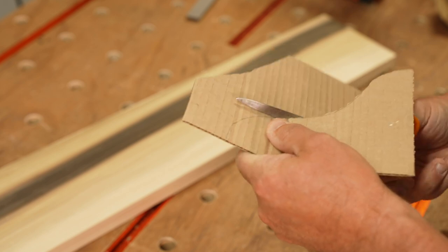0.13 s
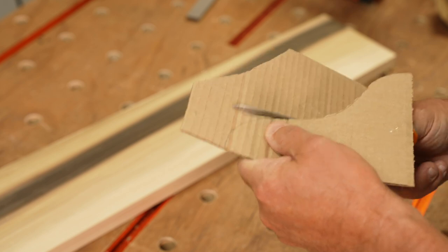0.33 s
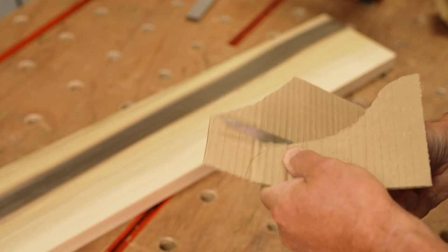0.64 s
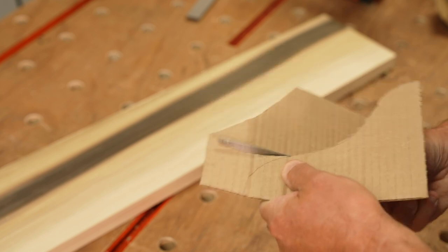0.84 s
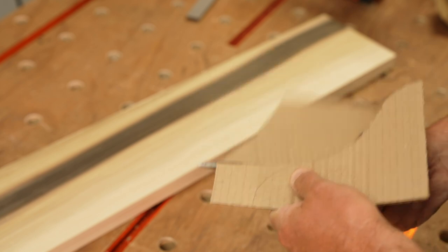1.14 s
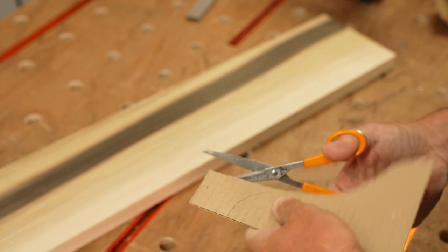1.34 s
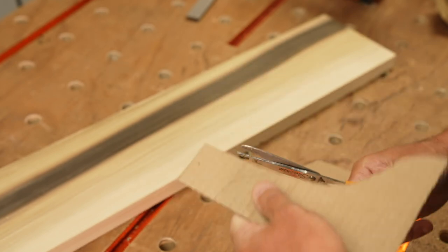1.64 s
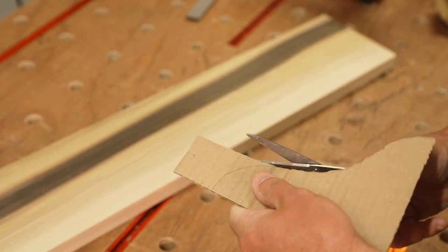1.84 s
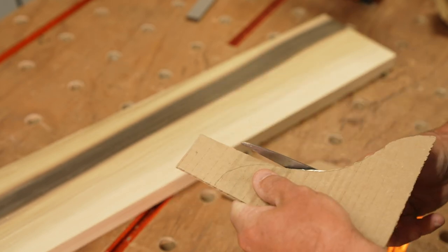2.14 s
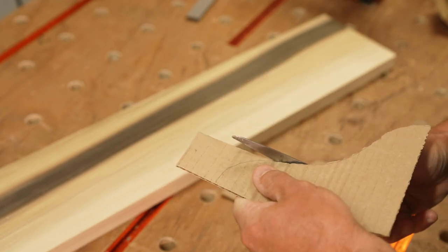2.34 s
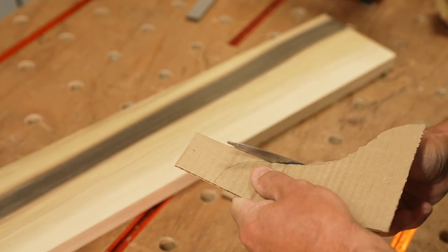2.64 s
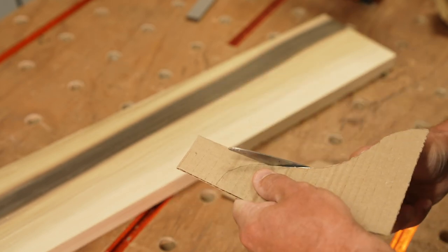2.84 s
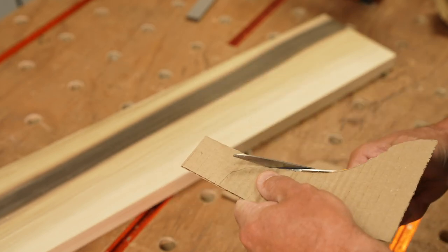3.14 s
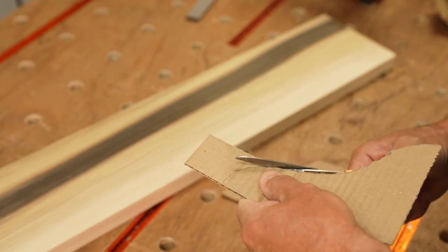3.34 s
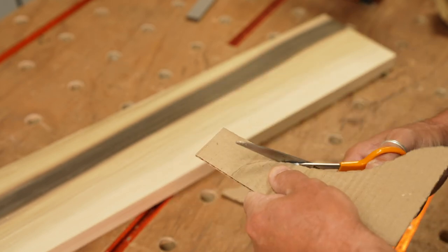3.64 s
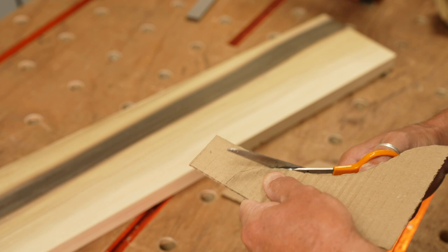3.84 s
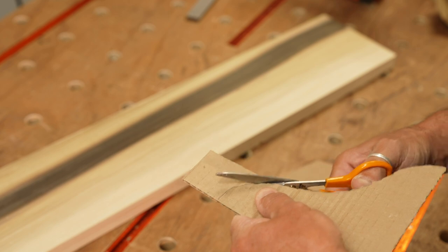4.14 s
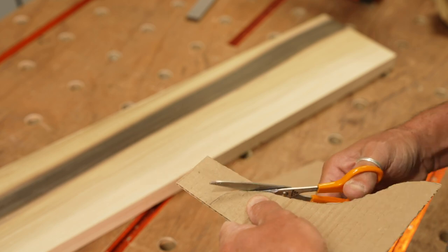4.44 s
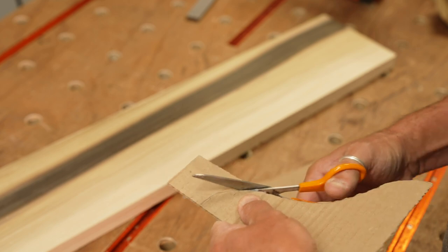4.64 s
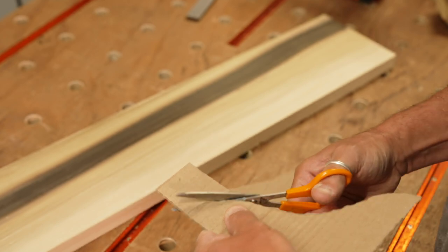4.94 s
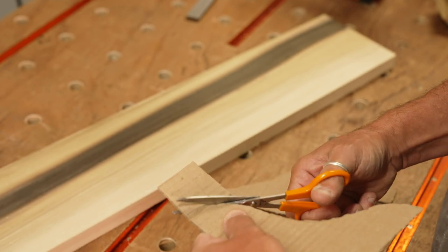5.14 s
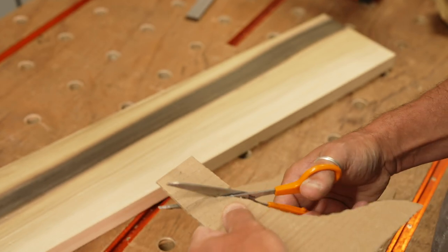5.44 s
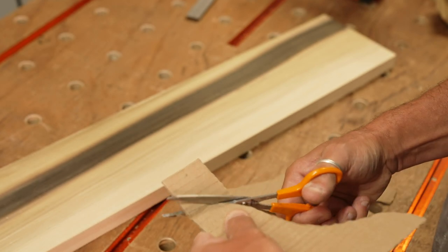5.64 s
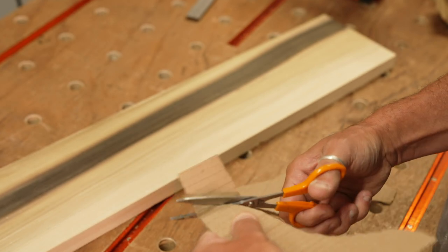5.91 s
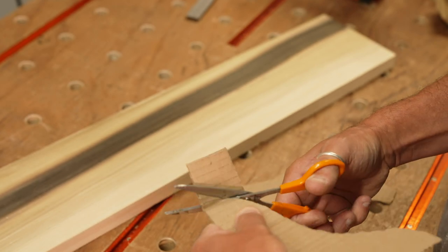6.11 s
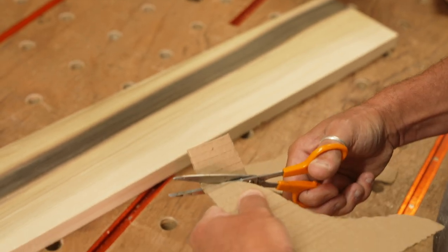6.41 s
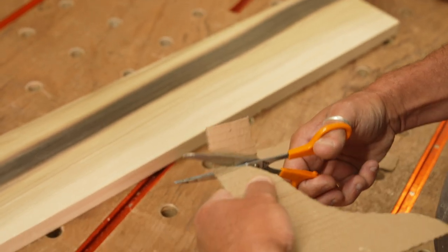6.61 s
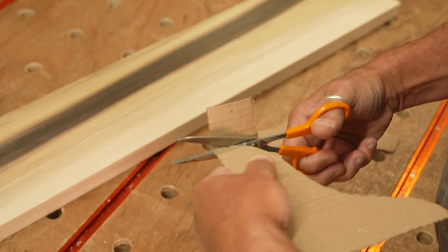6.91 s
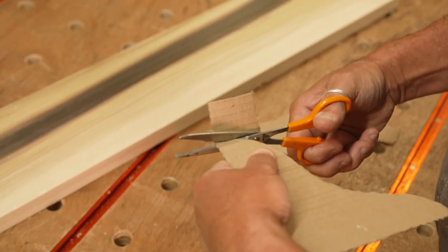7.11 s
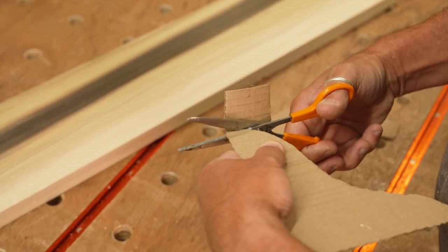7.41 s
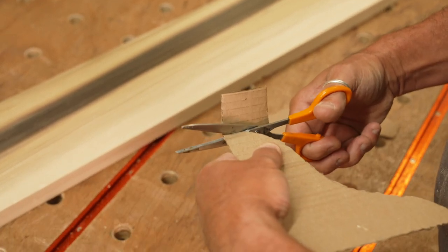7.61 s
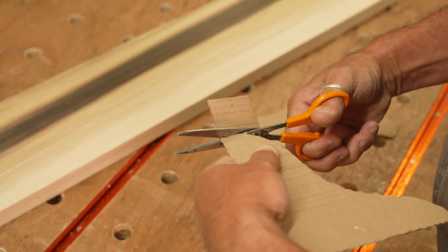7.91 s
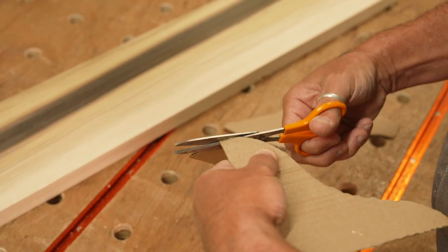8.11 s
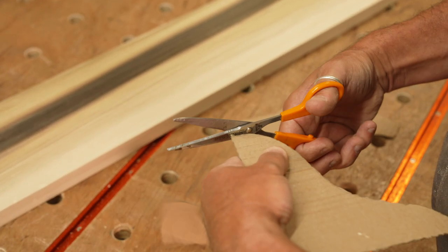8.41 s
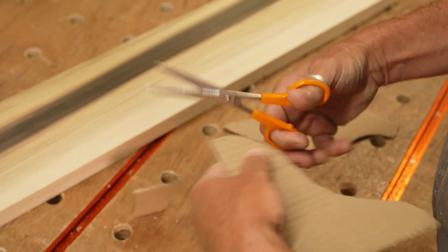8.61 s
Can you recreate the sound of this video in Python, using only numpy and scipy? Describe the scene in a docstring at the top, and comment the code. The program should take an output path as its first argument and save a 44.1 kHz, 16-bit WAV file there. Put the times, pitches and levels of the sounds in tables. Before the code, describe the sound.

Scissors crunch and snip through corrugated cardboard close up, with dry snaps, papery rasps and soft low handling bumps in a quiet workshop.

```python
"""Scissors work through a piece of corrugated cardboard above a workbench, close by, in a small quiet workshop.
Each squeeze is a coarse crunch of many tiny random fractures; short bursts of noise snap through the flutes.
Between squeezes blades and fingers rasp along the card; hands bump it as short low tones and bend it as rumble.
Resonances of the cut edge, the paper and the card colour the noise; the card goes from sheet to short strip."""
import sys
import numpy as np
from scipy import signal
from scipy.fft import rfft, irfft
from scipy.io import wavfile
from scipy.ndimage import uniform_filter1d

SR = 44100
rng = np.random.default_rng(int(sys.argv[2]) if len(sys.argv) > 2 else 0)


def wav_record(signal):
    """Record a signal, one row per channel, as 16-bit PCM in the file named by sys.argv[1]."""
    frames = np.transpose(np.atleast_2d(signal))
    bounded = np.clip(frames, -1, 1)
    # unit amplitude maps onto the largest positive 16-bit level
    quanta = np.round(bounded * 32767).astype(np.int16)
    wavfile.write(sys.argv[1], SR, quanta)


N = 386316

# Levels in the event tables are those before the final mix in scene().
BLOW_S = .004  # levels of snaps and ticks refer to a blow of this length


def amp(db):
    """Turn decibels into a gain."""
    return 10 ** (np.asarray(db) / 20)


def unit(x):
    """Scale to unit energy."""
    return x / np.sqrt(np.sum(x ** 2) + 1e-18)


def add(track, s, sound):
    """Mix a sound into the track at time s."""
    i = max(int(s * SR), 0)
    track[i:i + len(sound)] += sound[:max(N - i, 0)]


def through(x, response):
    """Pass a sound through an impulse response."""
    return signal.fftconvolve(x, response)[:len(x)]


def colour(points, peak_hz=1000, peak_db=0, peak_share=.1, top_db=0, size=2048):
    """Unit-energy filter that starts at once: a spectrum with one resonance and a treble shelf."""
    hz, db = np.transpose(points)
    f = np.maximum(np.fft.rfftfreq(size, 1 / SR), 1)
    # beyond the given points the spectrum falls by 20 dB per octave
    octaves_outside = np.abs(np.log2(f / np.clip(f, hz[0], hz[-1])))
    shape = np.interp(np.log(f), np.log(hz), db) - 20 * octaves_outside
    shape += top_db * np.clip(2 * np.log2(f / 9000), 0, 1)
    resonance = 1 + (amp(peak_db) - 1) / (1 + (2 * np.log(f / peak_hz) / peak_share) ** 2)
    # folding the cepstrum gives minimum phase: the energy comes as early as it can
    cepstrum = irfft(np.log(amp(shape) * resonance))
    cepstrum[1:size // 2] *= 2
    cepstrum[size // 2 + 1:] = 0
    return unit(irfft(np.exp(rfft(cepstrum))))


def wander(rate):
    """Slow random drift with a spread of 1; rate is in steps per second."""
    k = max(int(SR / rate), 1)
    steps = np.repeat(rng.standard_normal(N // k + 1), k)[:N]
    slow = uniform_filter1d(steps, k)
    return slow / slow.std()


def gesture(s, length_s, attack_s, release_s, swell_db=0):
    """Start and envelope of one hand movement: it eases in, swells or fades steadily, and eases out."""
    t = np.arange(-min(s, 2 * attack_s), length_s + 2 * release_s, 1 / SR)
    ease = lambda u: .5 + .5 * np.tanh(u / 2 - 1)
    swell = amp(swell_db * (np.clip(t / length_s, 0, 1) - .5))
    return s + t[0], ease(t / attack_s) * ease((length_s - t) / release_s) * swell


def pressure(strokes, attack_s, release_s):
    """How hard the strokes drive the cut edge, the liner paper and the card body."""
    drive = np.zeros((3, N))
    for s, length_s, db, swell_db, liner_db, body_db in strokes:
        begins, envelope = gesture(s, length_s, attack_s, release_s, swell_db)
        for track, rel_db in zip(drive, (0, liner_db, body_db)):
            add(track, begins, amp(db + rel_db) * envelope)
    return drive


def fibres(rate, spread_db, catch_rate, catch_db, even_s=0.04):
    """Fibres break at random with unequal sizes, in bunches as the blade catches and slips."""
    breaks = rng.random(N) < rate / SR
    size_db = spread_db * np.minimum(rng.exponential(size=N), 4) + catch_db * wander(catch_rate)
    force = breaks * amp(size_db) * rng.choice([-1, 1], N)
    # the hand feeds the blade steadily, so the power over a longer time stays even
    power = uniform_filter1d(force ** 2, max(int(even_s * SR), 1))
    return force / np.sqrt(np.maximum(power, 1e-3))


# resonances of the whole sheet, held loosely: [centre f/Hz, width f/Hz, level/dB relative]
SHEET_MODES = [(404, 90, -9), (545, 110, -1.5), (781.5, 69, -7), (1033, 70, -1), (1084, 80, -3.5),
               (1411, 150, -9), (1476, 210, -18), (1726, 160, -4.5), (1994, 100, -4.5)]
# resonances of the short strip, pinched by the thumb: [centre f/Hz, width f/Hz, level/dB relative]
STRIP_MODES = [(560, 160, -7), (745, 180, -7), (1047, 100, -3.5), (1199, 110, 2), (1580, 360, -2),
               (2010, 440, -1)]


def card(s, main_hz, main_db=-5.5, main_share=0.086, bend=0.026, size=2048):
    """Ring of the card at time s: fading tones, shifted a little by bending, and the one the grip leaves freest."""
    regrip_s = 3.7  # from here on the short strip rings instead of the sheet
    t = np.arange(size) / SR
    mode = lambda hz, width: width * np.exp(-np.pi * width * t) * np.sin(2 * np.pi * hz * t)
    ring = 0
    for hz, width, db in (SHEET_MODES if s < regrip_s else STRIP_MODES):
        sign = rng.choice([-1, 1])
        bent_hz = hz * (1 + bend * rng.standard_normal())
        ring = ring + sign * amp(db) * mode(bent_hz, width)
    main = unit(mode(main_hz, main_share * main_hz))
    # the free tone swings in step with its neighbours
    return unit(unit(ring) + np.copysign(amp(main_db), ring @ main) * main)


# each new bite and grip retunes the card and the cut edge:
# [start t/s, card f/Hz, liner paper f/Hz, cut edge f/Hz, top octave level/dB]
GRIP_TUNINGS = [(0, 742, 4800, 6660, -4), (0.355, 985, 2200, 9600, -2), (0.509, 478, 2030, 9200, 1),
                (0.72, 1030, 2250, 7350, 0), (0.9, 1090, 4400, 9350, 4.5), (1.19, 1110, 2730, 6150, -3),
                (1.42, 875, 2360, 7500, 2.5), (1.76, 887, 2800.0, 6100, -1), (2.1, 1140, 3800, 7000, -5),
                (2.55, 850, 3900, 7260, 1), (2.9, 1150, 2300, 5700, 0), (3.31, 667, 3730, 9300, 3.5),
                (3.5, 450, 3460.0, 6200, 0.5), (3.86, 730, 3900, 9100, 2), (4.1, 920, 3000, 6930.0, -2.5),
                (4.27, 1140, 3800, 7050, 1), (4.5, 910, 4720, 7700, -1.5), (4.87, 944, 3800, 8150, 0),
                (4.98, 1190, 3880, 7740.0, 5), (5.24, 1120, 3940, 7600, -1), (5.5, 1160, 2040, 7140, 6.5),
                (5.71, 1104, 2160, 5500, -3.5), (5.95, 1370, 2010.0, 7700, -0.5),
                (6.24, 1780, 3400, 7340, 0.5), (6.56, 1700, 4170, 7300, 3), (6.88, 706, 4180.0, 6840, 1.5),
                (7.27, 1710, 2080.0, 7220.0, 4), (7.52, 504, 4300, 7140, 2.5), (8.03, 1310, 3440, 9820, -2),
                (8.28, 664, 4230, 9810.0, -1), (8.47, 565, 4300, 5560, 1.5)]
# basic spectrum of the crisp cut edge: [f/Hz, level/dB]
EDGE_SPECTRUM = [(3000, -44), (4600, -15), (5400, -2), (6300, 1), (7500, 0.5), (9500, 0), (11500, -3.5),
                 (14000, -8), (16000, -16.5)]
# basic spectrum of the liner paper: [f/Hz, level/dB]
LINER_SPECTRUM = [(1200, -31.5), (1900, -9.5), (2200, -0.5), (3050, -2), (4700, 0.5), (5600, -9.5),
                  (8000, -35)]
# width of the edge and liner resonances as a share of their frequency
EDGE_WIDTH, LINER_WIDTH = .13, .17


def voices(s, edge_db, paper_db, scatter):
    """Responses of the cut edge, the liner paper and the card body under the grip held at time s."""
    held = max(np.searchsorted([row[0] for row in GRIP_TUNINGS], s, "right") - 1, 0)
    _, card_hz, liner_hz, edge_hz, top_db = GRIP_TUNINGS[held]
    # edge and paper are detuned slightly at random
    edge_shift, liner_shift = np.exp(scatter * rng.standard_normal(2))
    edge = colour(EDGE_SPECTRUM, edge_hz * edge_shift, edge_db, peak_share=EDGE_WIDTH, top_db=top_db)
    liner = colour(LINER_SPECTRUM, liner_hz * liner_shift, paper_db, peak_share=LINER_WIDTH)
    return edge, liner, card(s, card_hz)


def radiate(force, drive, vary_db, vary_rate=160):
    """A train of tiny fractures sounds from the cut edge, the liner paper and the body of the card."""
    pushes = force * drive
    # every bunch of fibres has its own balance of edge, liner and body
    pushes = pushes * amp([vary_db * wander(vary_rate) for _ in pushes])
    starts = [int(row[0] * SR) for row in GRIP_TUNINGS]
    borders = np.append(np.clip(starts, 0, N - 2), N)
    out = np.zeros(N)
    for a, b in zip(borders, borders[1:]):
        responses = voices((a + b) / 2 / SR, edge_db=4.0, paper_db=4.5, scatter=.01)
        for push, response in zip(pushes, responses):
            add(out, a / SR, signal.fftconvolve(push[a:b], response))
    return out


# blades and fingers sliding over the card: [start t/s, length t/s, crisp edge level/dB,
# swell from start to end level/dB, liner paper level/dB and card body level/dB relative to the edge]
SLIDE_STROKES = [(0, 0.071, -65.5, -29, 0, -0.5), (.53, 0.13, -39, 3, -7.5, -4.5),
                 (.65, 0.079, -52, 16, -7, -2.5), (.902, .16, -43, 0, -5.5, -6.5),
                 (2.165, .095, -61, 9, -1.5, -1), (2.25, 0.074, -53, -2, -5.5, -1),
                 (2.34, 0.093, -69.5, 7, -2, 3), (2.94, .19, -64, 2, -4, -1),
                 (3.13, 0.095, -67, -16, 0, 8.5), (3.51, 0.087, -43.5, 9, -6.5, -18.5),
                 (3.6, 0.17, -63.5, 13, -4, -5.5), (4.508, 0.04, -60.5, 1, -1, -3),
                 (4.533, 0.12, -49.5, -15, -6, -16.5), (5.25, 0.04, -52, -1, -7, -10),
                 (5.277, 0.099, -48.5, -3, -3, -6.5), (5.345, 0.087, -66, -15, 0, 5.5),
                 (5.966, 0.13, -51.5, 7, -1, -1), (6.655, .09, -51, -4, -4.5, -6),
                 (7.288, 0.097, -54.5, 5.5, -3, -5), (8.29, 0.15, -57, -10, -10, -10),
                 (8.49, 0.11, -59.5, 10, -4, -13), (8.628, 0.075, -53, -11, -2, -6),
                 (8.695, 0.083, -63.5, -8, -3, -3)]
SLIDE_ATTACK_S, SLIDE_RELEASE_S = 0.0055, 0.0088  # a slide eases in and out


def sliding():
    """Steel and skin rub along the card: a fine, dense rasp of very many tiny fractures."""
    force = fibres(rate=14000, spread_db=2.5, catch_rate=300, catch_db=0.3, even_s=0.0096)
    return radiate(force, pressure(SLIDE_STROKES, SLIDE_ATTACK_S, SLIDE_RELEASE_S), vary_db=2.0)


TICK_DB = -74  # the smallest tick


def ticks(rate=42, spread_db=3.8, liner_db=-9, body_db=-13):
    """Stray fibres and the pivot tick faintly at random all the time, also between the strokes."""
    happens = rng.random(N) < rate / SR
    force = happens * amp(TICK_DB + spread_db * np.minimum(rng.exponential(size=N), 3))
    edge, liner = colour(EDGE_SPECTRUM), colour(LINER_SPECTRUM)
    response = edge + amp(liner_db) * liner + amp(body_db) * card(0, 1150)
    return np.sqrt(BLOW_S * SR) * through(force, response)


# the hand bends the card: [start t/s, length t/s, rumble level/dB, flutter level/dB]
BENDS = [(0.476, .24, -56, -52.5), (0.694, 0.74, -66, -60), (1.39, 0.42, -54, -55),
         (1.72, 0.65, -48.5, -53.5), (2.345, 0.26, -57.5, -58.5), (2.706, 0.17, -60, -56),
         (3.027, 0.26, -84, -65), (3.99, 1, -75.5, -73.5), (5.22, 0.55, -70, -68.5),
         (7.028, 0.54, -72, -69), (8.44, 0.45, -58, -62)]
# spectrum of the low rumble: [f/Hz, level/dB]
RUMBLE_SPECTRUM = [(25, -39), (50, -42), (80, 0.5), (105, 5.5), (170, 1.5), (240, -27.5), (400, -44.5)]
# spectrum of the higher flutter: [f/Hz, level/dB]
FLUTTER_SPECTRUM = [(120, -26.5), (220, -1), (300, 2), (410, -1.5), (520, -10), (800, -23.5), (2000, -69.5)]
FLEX_ATTACK_S, FLEX_RELEASE_S = 0.025, 0.022  # a bend eases in and out
HOLD_RUMBLE_DB, HOLD_FLUTTER_DB = -88.5, -76  # while the card is only held


def flexing(judder_db=2.0, lurch_db=0.5):
    """Fingers creep and lurch on the sheet: unsteady low noise makes it rumble and flutter."""
    low, high = np.full(N, amp(HOLD_RUMBLE_DB)), np.full(N, amp(HOLD_FLUTTER_DB))
    for s, length_s, rumble_db, flutter_db in BENDS:
        begins, bend = gesture(s, length_s, FLEX_ATTACK_S, FLEX_RELEASE_S)
        add(low, begins, amp(rumble_db) * bend)
        add(high, begins, amp(flutter_db) * bend)
    rumble = through(rng.standard_normal(N), colour(RUMBLE_SPECTRUM))
    flutter = through(rng.standard_normal(N), colour(FLUTTER_SPECTRUM))
    unsteady = amp(judder_db * wander(45) + lurch_db * wander(16) - 3.0)
    return unsteady * (rumble * low + flutter * high)


# spectrum of the quiet workshop: [f/Hz, level/dB]
SHOP_SPECTRUM = [(30, -8), (60, -7.5), (100, 8.5), (170, 8.5), (300, 8), (700, 4), (1200, 0.5), (3000, -7),
                 (5000, -6.5), (7300, -5.5), (10000, -10.5), (13000, -14), (16000, -16)]
SHOP_DB = -68.5


def workshop():
    """Still air: a faint noise whose level barely drifts."""
    return amp(SHOP_DB + .5 * wander(1.5)) * through(rng.standard_normal(N), colour(SHOP_SPECTRUM))


def flutes(per_s=42, uneven=.25, ridge_db=6):
    """The blades meet one flute after another: the crunch jumps at each ridge and sags until the next."""
    passed = np.cumsum(per_s * np.exp(uneven * wander(30))) / SR
    return unit(amp(-ridge_db * (passed % 1))) * np.sqrt(N)


# squeezes of the blades: [start t/s, length t/s, crisp edge level/dB,
# swell from start to end level/dB, liner paper level/dB and card body level/dB relative to the edge]
SQUEEZES = [(.245, 0.11, -64, -5, -3.5, -2.5), (.322, 0.055, -46.5, 5, -15, -15),
            (.358, 0.11, -45, -6, -2.5, -8), (.731, 0.076, -40.5, 12.5, -3, -5),
            (1.045, 0.15, -42.5, 1, -6.5, -10), (1.198, 0.031, -36, -12, -1.5, -15),
            (1.25, 0.091, -52.5, 18, 0, -5), (1.425, 0.075, -51, 7, -12, -15),
            (1.502, 0.048, -50.5, 5, 0, 2), (1.55, 0.24, -58.5, -17, -7.5, -16),
            (1.885, 0.053, -52.5, -5, -6, -3), (1.978, 0.048, -50.5, -9, -4.5, -7.5),
            (2.57, .13, -62.5, -5, -7, -14), (3.322, 0.017, -34.5, -15, -7, -8),
            (3.875, 0.14, -64, -12, -12, -25), (4.015, 0.12, -52.5, -3, -9.5, -16.5),
            (4.1, .14, -53.5, 8, -8, -17), (4.275, 0.088, -59, -12, -7, -9.5),
            (4.875, 0.094, -48, -10, -6.5, -15), (4.995, 0.076, -53.5, -11, -5, -11.5),
            (5.125, 0.062, -55, -12, -9.5, -10), (5.5, 0.092, -69, 2, -3, -3.5),
            (5.59, 0.1, -57, -1, -8, -8.5), (5.724, 0.07, -42, -15, -7.5, -19.5),
            (5.785, 0.061, -57.5, -2, -8, -8.5), (6.255, 0.026, -51.5, -1, -16, -11),
            (6.29, 0.14, -52.5, -3, -7.5, -11.5), (6.945, 0.13, -55.5, -5.5, -10, -16),
            (7.07, .13, -63.5, 6, -12, -14), (7.63, 0.18, -58.5, 1.5, -13, -21),
            (7.875, 0.18, -62, -4, -14.5, -21), (8.035, 0.1, -54, -7, -9.5, -17),
            (8.125, 0.096, -60, 36, -12, -17)]
CUT_ATTACK_S, CUT_RELEASE_S = .0017, 0.0047  # a squeeze bites at once


def cutting():
    """The closing blades crush and shear the fibres: a coarse crunch."""
    force = flutes() * fibres(rate=2600, spread_db=0.5, catch_rate=200, catch_db=4.5, even_s=0.047)
    return radiate(force, pressure(SQUEEZES, CUT_ATTACK_S, CUT_RELEASE_S), vary_db=2.5)


# single snaps of flutes and liners, loud and faint, and the crack of the last knock:
# [start t/s, crisp edge level/dB over one blow,
# liner paper level/dB and card body level/dB relative to the edge, nominal tear length t/ms]
SNAP_EVENTS = [(.342, -37, -12, -18, .4), (.3456, -30.5, -17, -16.5, .7), (.375, -24, -7, -11, 3.1),
               (0.4202, -32, -9, -5, 1.8), (0.734, -27, -10, -11, 2.7), (.758, -29.5, -7.5, 0, 1.7),
               (0.7669, -36, -20, 1, 1.6), (0.78, -29.5, -22, -1.5, 2.2), (.797, -30.5, -7, 1.5, 3.3),
               (1.074, -40, -11, -9, 3), (1.098, -36, -11, -7, 3), (1.1213, -33, -8, -7.5, 4.7),
               (1.141, -36, -8, -8, 2.2), (1.156, -38, -6, -23, 3.4), (1.1996, -28, -13.5, -3, 4.2),
               (1.2055, -23, -8, -8, 2.2), (1.3154, -38.5, -5, -7, 3), (1.4792, -43.5, -5, 4, 2),
               (1.5084, -47.5, 9.5, 11.5, 1.6), (1.518, -43.5, 3, 9.5, 1.6), (1.7854, -42.5, -1, 0.5, .6),
               (1.804, -46, -5, -4, 1.5), (1.8847, -57, -8, 6, 1.9), (1.9038, -41.5, 2, 8, 1.7),
               (1.6257, -47.5, -4, -6, 4), (1.9842, -46, -7, -16, 5), (1.9985, -37.5, -13, -16, .5),
               (2.0128, -42.5, -14, -26, 1.3), (2.165, -55.5, 3.5, -1, 2), (2.651, -48, -11, -8, .9),
               (2.8215, -49, -6, -6.5, 3), (2.9321, -40.5, -9, -15, 3.1), (3.2503, -49.5, -2, .5, 3),
               (3.3208, -26, -2.5, -11, .6), (3.3532, -37.5, -23, -29, .6), (3.3743, -37.5, -25, -31, .8),
               (3.8776, -39.5, -20, -34, .6), (3.8942, -50, -14, -25, 1.1), (3.932, -43, -17, -28, .6),
               (4.0316, -46, -14, -25, 1), (4.1077, -27.5, -6, -15, 0.88), (4.2112, -39, -16, -31, .4),
               (4.28, -41, -10.5, -27, 0.82), (4.5446, -35.5, -12, -25, .6), (4.8796, -28.5, -3.5, -11, 4),
               (4.926, -35.5, -1.5, -14.5, 2.7), (4.997, -45.5, 0, -30, .5), (5.0335, -43.5, -0.5, -10, .5),
               (5.05, -46.5, -4, -6.5, 1.1), (5.1024, -48.5, -4.5, -12, 2.4), (5.13, -48.5, -8, -5, 1.5),
               (5.154, -45, -7.5, -15, .6), (5.5927, -45, -9, -14, 2.5), (5.7279, -26, -5, -8.5, 1.6),
               (6.083, -39.5, -6.5, -26, .5), (6.2655, -47, -17, -27, .9), (6.2864, -38.5, -15, -18, 3.5),
               (6.3106, -39, -6, -20, 2.2), (6.329, -50, -5, -19, 2.5), (6.358, -51, -7, -10, 2),
               (6.3834, -50, -7, -17, 2.8), (6.4015, -36, -8.5, -25, 4.2), (6.455, -48.5, -11, -20, 2.2),
               (6.583, -47.5, -18, -33, .6), (6.825, -53.5, -29, -22, 1.7), (6.911, -50, -22, -39, 0.37),
               (6.9922, -43.5, -11, -31, 2.2), (7.115, -55, -8, -20, 2.4), (7.557, -50.5, -12, -26, .7),
               (7.63, -48, -10, -30, .7), (7.712, -47.5, -8, -19, 4.1), (7.9378, -49.5, -23, -19, .9),
               (8.0425, -40.5, -14, -17.5, 1.7), (8.0806, -39.5, -11, -13.5, 2.9),
               (8.209, -35.5, -6, -11, 1.5), (8.373, -36.5, -7, -15.5, 1.3), (8.489, -45.5, -4.5, -18, 6.4),
               (8.5324, -44.5, -6, -13, 2.6), (8.743, -60.5, -4, 9.5, 2.5)]


def snaps(tail=1.54, shortest_ms=1.0, body_lag_s=0.00028, size=900):
    """Each snap or crack is a short avalanche of fractures that kicks the card; each rings a little differently."""
    out, t = np.zeros(N), np.arange(size) / SR
    for s, db, liner_db, body_db, tear_ms in SNAP_EVENTS:
        age = t / (max(tear_ms, shortest_ms) * 1e-3)  # in tear lengths
        tear = rng.standard_normal(size) * np.sqrt(age) * np.exp(-2 * age / tail)
        responses = voices(s, edge_db=5.0, paper_db=10, scatter=0.0063)
        for response, rel_db, lag in zip(responses, (0, liner_db, body_db), (0, 0, body_lag_s)):
            gain = amp(db + rel_db) * np.sqrt(BLOW_S * SR)
            add(out, s + lag, gain * unit(signal.fftconvolve(tear, response)))
    return out


# soft knocks of hands and handles on the card: [start t/s, level/dB, pitch f/Hz]
KNOCKS = [(0.55, -40.5, 366), (0.778, -33, 450), (0.948, -40.5, 264), (1.144, -43, 330),
          (1.202, -49.5, 345), (1.507, -41, 340), (1.885, -44.5, 286), (2.166, -41.5, 96.5),
          (2.343, -38, 110), (2.389, -39, 139.5), (2.524, -44, 111), (2.568, -44, 109), (2.747, -31.5, 105),
          (2.82, -50, 410), (2.931, -44, 281), (3.125, -44, 79), (3.253, -41, 106), (3.319, -48.5, 470),
          (3.57, -50.5, 445), (7.174, -53, 83.4), (7.403, -52, 143), (7.635, -46.5, 100), (7.774, -52, 107),
          (8.369, -46.5, 84), (8.523, -41, 113), (8.735, -40, 376)]


def bumps(rise_s=0.0068, overtone=3.5, overtone_db=-14, gritty_hz=230, gain_db=1, size=5000):
    """A soft push makes the damped sheet swing for a few cycles; higher knocks are rougher."""
    out, t = np.zeros(N), np.arange(size) / SR
    swell = (t / rise_s) ** 2 * np.exp(2 - 2 * t / rise_s)
    for s, db, hz in KNOCKS:
        swing = np.sin(2 * np.pi * hz * t) + amp(overtone_db) * np.sin(2 * np.pi * overtone * hz * t)
        rub_spectrum = [(hz / 4, -24), (hz / 2, -5), (hz, 0), (2.5 * hz, -13)]
        rub = through(rng.standard_normal(size), colour(rub_spectrum))
        grit = (hz / gritty_hz) ** 2  # amount of rubbing noise against the tone
        add(out, s, amp(db + gain_db) * swell * (swing + grit * rub) / np.sqrt(1 + grit ** 2))
    return out


# time the room takes to fade by 60 dB: [f/Hz, fade t/s]
ROOM_FADE = [(200, 0.23), (1000, 0.32), (3700, 0.36), (8000, .26), (15000, 0.35)]


def room(x, bench_db=-9, bench_s=0.00494, bench_fade_s=0.011, wall_db=-11.5, wall_s=0.0056, size=22000, count=10):
    """The bench and nearby things scatter the sound early; the walls add a short tail."""
    t = np.arange(size) / SR
    early = rng.standard_normal(size) * (t > bench_s) * np.exp(-t / bench_fade_s)
    hz, t60 = np.transpose(ROOM_FADE)
    borders = np.geomspace(100, 18000, count)
    late = 0
    for lo, hi in zip(borders, borders[1:]):
        band_filter = signal.butter(2, [lo, hi], "band", fs=SR, output="sos")
        band = signal.sosfilt(band_filter, rng.standard_normal(size))
        late = late + band * amp(-60 * t / np.interp(np.sqrt(lo * hi), hz, t60))
    # the tail starts after wall_s and is fully in at twice that time
    late = late * np.clip(t / wall_s - 1, 0, 1)
    return x + through(x, amp(bench_db) * unit(early) + amp(wall_db) * unit(late))


def scene():
    """Scissors, card and hands in the workshop."""
    work = sliding() + ticks() + amp(-1.5) * flexing()
    work = work + amp(0.64) * cutting() + amp(-0.93) * snaps() + amp(-1.0) * bumps()
    return (room(work) + workshop())[None]


def record(dry, low_cut_hz=66, top_hz=16000):
    """The microphone thins the deep bass, and a steep filter cuts the top."""
    bass_cut = signal.butter(2, low_cut_hz, "high", fs=SR, output="sos")
    top_cut = signal.ellip(10, .2, 70, top_hz, fs=SR, output="sos")
    return signal.sosfilt(top_cut, signal.sosfilt(bass_cut, dry))


dry = scene()
out = record(dry)
wav_record(out)
```